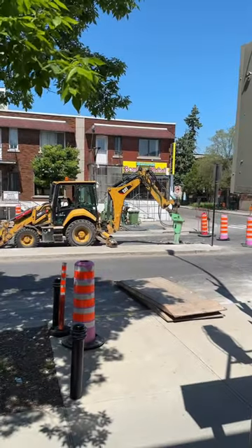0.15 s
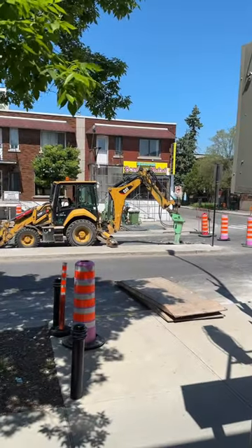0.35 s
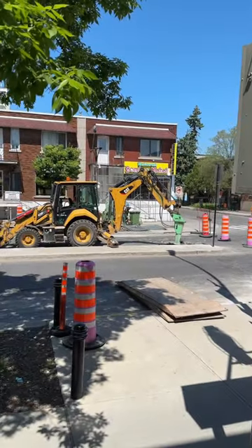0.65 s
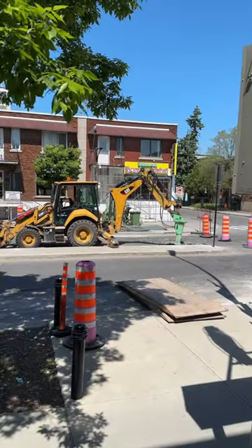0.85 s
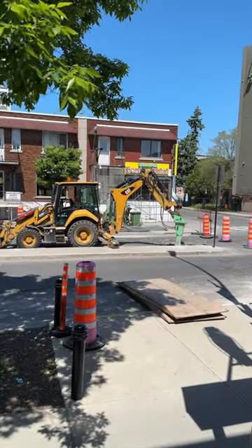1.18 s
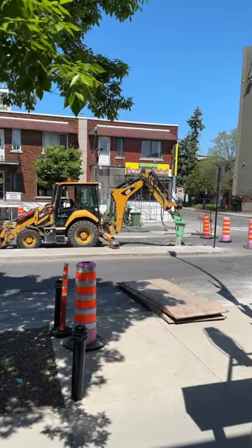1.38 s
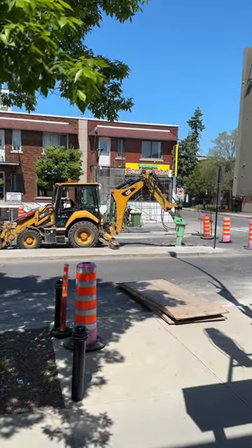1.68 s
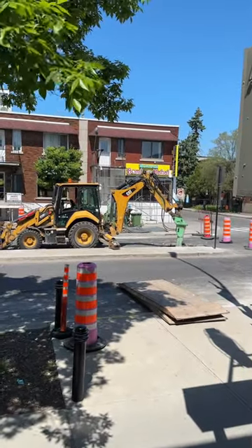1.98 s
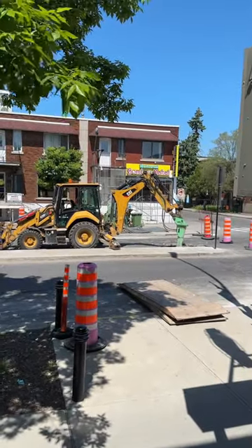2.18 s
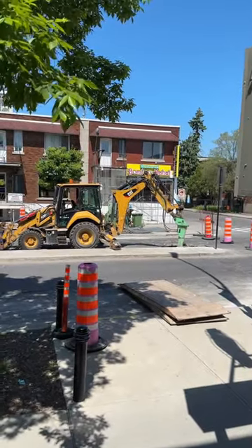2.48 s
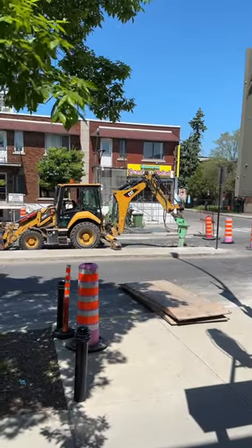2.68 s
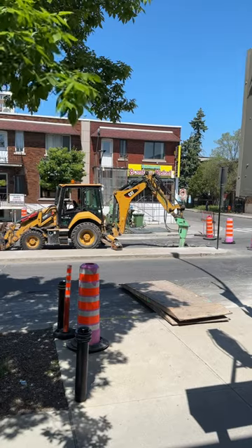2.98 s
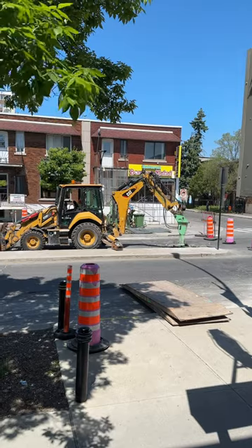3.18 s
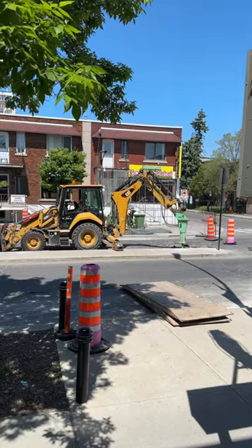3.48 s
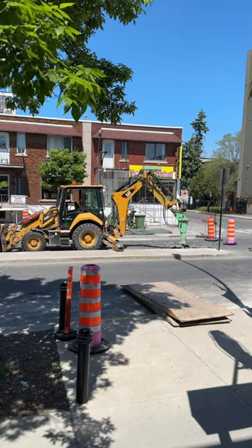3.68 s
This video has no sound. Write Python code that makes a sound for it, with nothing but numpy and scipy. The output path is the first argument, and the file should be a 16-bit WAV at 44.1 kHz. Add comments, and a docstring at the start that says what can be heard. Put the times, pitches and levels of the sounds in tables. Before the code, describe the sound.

A hydraulic breaker pounds stone rapidly with ringing steel over a diesel rumble, picked up by a phone across the street. The blows end with a short echo, loose metal clanks lightly, and the engine keeps running.

```python
"""A diesel engine rumbles across a street while its hydraulic breaker strikes about 14 times a second.
Each blow cracks on stone, rattles and rings the steel housing, thuds into the road and keeps the boom
ringing; loose chips tick and house fronts echo it. Near 2.5 s the blows stop and the street rings out.
Loose steel settles in a few small clanks as the engine runs on. A phone with two microphone ports listens."""
import sys
import numpy as np
from scipy import signal
from scipy.fft import rfft, irfft, next_fast_len
from scipy.io import wavfile
from scipy.ndimage import uniform_filter1d, map_coordinates

SR = 44100
rng = np.random.default_rng(int(sys.argv[2]) if len(sys.argv) > 2 else 0)


def to_wav(sig):
    """Store sig (one row per channel, or 1-D mono) as 16-bit WAV at the path in sys.argv[1].

    Samples outside -1..1 are clipped; the rate is SR.
    """
    pcm = np.clip(np.atleast_2d(sig), -1, 1) * 32767
    pcm = np.round(pcm).astype(np.int16)
    wavfile.write(sys.argv[1], SR, pcm.T)  # frames by channels


N = 169785
LEAD = SR // 2  # samples of run-up before time zero

# Chisel blows: start_s, level_db, then relative_db at each COLOUR_HZ
BLOWS = [(0.0321, -13.5, -6.5, -5.5, -7, -10.5), (0.1015, -11.5, -7, -6, -7, -13.5),
         (0.171, -14, -4.5, -5, -7, -11), (0.2409, -14, -6.5, -4, -5, -10.5),
         (0.3088, -6.5, -13, -10.5, -13, -18), (0.3776, -7.5, -13.5, -11.5, -10, -18.5),
         (0.4493, -10, -10, -7.5, -9, -14), (0.5158, -12.5, -8, -6, -7.5, -11.5),
         (0.5853, -12, -7, -4.5, -10.5, -13.5), (0.6544, -5.5, -15.5, -10.5, -14.5, -20),
         (0.724, -12.5, -5.5, -4.5, -9.5, -13.5), (0.7936, -13.5, -7.5, -3, -8.5, -12),
         (0.8626, -6.5, -14, -10.5, -13.5, -18.5), (0.9328, -15, -3.5, -2.5, -6, -11),
         (1.0005, -12.5, -10, -5.5, -8, -13.5), (1.0699, -10.5, -8, -8.5, -10, -15),
         (1.1394, -14, -5.5, -6, -5.5, -14), (1.2081, -9.5, -10, -12, -11.5, -19),
         (1.276, -10.5, -11.5, -11.5, -10, -17.5), (1.3447, -19, -4.5, -4, -2, -10),
         (1.4142, -12.5, -8.5, -9, -9, -16), (1.482, -12, -9, -8, -8, -15.5),
         (1.5503, -3.5, -16, -16.5, -17.5, -23), (1.6198, -14.5, -4.5, -5, -7, -13.5),
         (1.6886, -15, -7, -4, -7, -13), (1.757, -8.5, -11, -10.5, -13, -19.5),
         (1.8266, -10, -15, -10, -10, -18), (1.8951, -12, -8.5, -7.5, -8.5, -15),
         (1.9636, -9, -13.5, -11, -11.5, -19), (2.0319, -11.5, -9.5, -12, -9.5, -16.5),
         (2.1012, -6, -13.5, -15.5, -15.5, -23.5), (2.169, -13, -9.5, -10.5, -9.5, -16.5),
         (2.2392, -13, -11, -9, -10, -16), (2.3081, -3.5, -17.5, -21.5, -19.5, -26),
         (2.376, -10, -17.5, -14, -12.5, -20.5), (2.4475, -8.5, -14, -17.5, -16.5, -22.5)]
# Blow spectrum knots: frequency_hz
COLOUR_HZ = [450, 1500, 3200, 6600]
# Treble edge of the blows: time_s, gain_db
EDGE = [(0, 2), (.6, -1), (.95, 0.5), (1.1, -2), (1.4, -1), (1.6, -0.7), (2.45, 0.3)]
PERIOD_S, BLOW_CORRELATION = 0.069, 0.6
EDGE_HZ, EDGE_OCTAVES = 5200, 0.27

def breaker():
    """The chisel hammers stone. Returns impacts and ringing steel, both starting LEAD samples early."""
    t = np.arange(SR // 4) / SR
    impacts, steel = np.zeros((2, N + LEAD + len(t))), np.zeros(N + LEAD + len(t))
    noise = rng.standard_normal((2, len(t)))
    for start_s, level_db, *relative_db in all_blows():
        depth = np.clip(start_s / BLOWS[-1][0], 0, 1)  # the chisel sinks in
        edge_db = curve(EDGE, start_s)
        spectrum = list(zip(COLOUR_HZ, relative_db))
        colour = lambda hz: amp(level_db + along(spectrum, hz) + edge_db * band(hz, EDGE_HZ, EDGE_OCTAVES))
        fresh = rng.standard_normal(noise.shape)
        noise = BLOW_CORRELATION * noise + np.sqrt(1 - BLOW_CORRELATION ** 2) * fresh
        add_at(steel, start_s, steel_ring(t, depth, colour))
        low, mid, high = (colour(hz) for hz in COLOUR_HZ[:3])
        blow = housing_rattle(t, start_s, noise, colour) + high * crack(t, depth)
        blow += low * thud(t) + road_thump(t) + mid * chips(t, start_s)
        add_at(impacts, start_s, blow)
    return impacts[:, :N + LEAD], steel[:N + LEAD]


def all_blows():
    """Six run-up blows before time zero, then BLOWS."""
    first_s, *levels_db = BLOWS[0]
    return [(first_s - k * PERIOD_S, *levels_db) for k in range(6, 0, -1)] + list(BLOWS)


# Rattle spectrum: frequency_hz, level_db
RATTLE_SPECTRUM = [(30, -66), (50, -46), (91, -18.5), (190, -31), (337, -13.5), (420, -10), (490, -10),
                   (580, -10.5), (700, -6.5), (1000, -9), (1580, -12.5), (2400, -18), (3500, -17),
                   (4140, -24.5), (5500, -18.5), (6710, -18.5), (8000, -25.5), (9600, -20), (11000, -21)]
# Rattle band envelopes: centre_hz, rise_s, base_t60_s
RATTLE_BANDS = [(92.4, 0.024, 0.36), (327, 0.0077, 0.32), (794, 0.0041, 0.048), (1580, 0.0077, 0.15),
                (2800, 0.00015, 0.13), (4630, 0.0023, 0.092), (6400, 0.0014, 0.066),
                (11800, 0.00011, 0.066)]
# Rattle length: time_s, t60_factor
RATTLE_STRETCH = [(0, 0.73), (.8, 1), (1.05, 0.9), (1.4, 1.46), (1.6, 0.99), (2.2, 1.23), (2.45, 1.35)]

def housing_rattle(t, start_s, noise, colour, gain_db=27):
    """The housing rattles: a noise burst whose bands swell and die at their own rates."""
    centres_hz = [row[0] for row in RATTLE_BANDS]
    split = lambda hz: np.array([along(list(zip(centres_hz, w)), hz) for w in np.eye(len(centres_hz))])
    bands = filtered(noise[:, None], lambda hz: amp(along(RATTLE_SPECTRUM, hz)) * colour(hz) * split(hz))
    stretch = curve(RATTLE_STRETCH, start_s)
    envelopes = np.array([rise(t, rise_s) ** 2 * decay(t, t60_s * stretch)
                          for _, rise_s, t60_s in RATTLE_BANDS])
    return amp(gain_db) * (bands * envelopes).sum(1)


# Housing and tool modes: pitch_hz, first_blow_db, last_blow_db, t60_s, rise_s
STEEL_MODES = [(308.4, -3, -14.5, 0.17, 0.0046), (336, -9.5, -7, 0.13, .006),
               (595.2, -4, -14, 0.18, 0.0014), (549, -13, -13, 0.16, .0016),
               (414.5, -16, -9.5, 0.22, 0.003), (750.4, -16, -16.5, 0.5, 0.0028),
               (711, -11.5, -11, 0.13, 0.00066), (1116, -6.5, -21, 0.087, 0.0052),
               (1163, -7, -3.5, 0.056, 0.0029), (1487, 0.5, -0.5, 0.037, 0.0019),
               (1616, 2.5, 1, 0.037, 0.0025), (1765, -12, -2, 0.071, 0.0024),
               (2160, -8.5, -12, 0.068, 0.0024), (2623, -6.5, -18, 0.095, 0.0012),
               (3030, -17, 3, .045, 0.0008), (3156, -13, 7, 0.029, 0.0026),
               (3520, -12.5, -14, 0.26, 0.0038), (4376, -11.5, -13.5, 0.065, .0016),
               (4880, -7, -6.5, 0.037, 0.00084), (5970, -1.5, -7, 0.024, .0012),
               (6595, 5, 2.5, 0.022, 0.0005), (6770, -10, -8, 0.12, .0012)]

def steel_ring(t, depth, colour, gain_db=2.35, scatter_db=1.5, detune=0.0035):
    """Housing and tool ring; the balance of their modes shifts as the chisel sinks in."""
    ring = np.zeros(len(t))
    for hz, first_db, last_db, t60_s, rise_s in STEEL_MODES:
        level_db = gain_db + first_db + depth * (last_db - first_db) + scatter_db * rng.normal()
        tone = np.sin(2 * np.pi * hz * (1 + detune * rng.normal()) * t)
        ring += colour(hz) * amp(level_db) * tone * rise(t, rise_s) * decay(t, t60_s)
    return ring


def crack(t, depth, width_s=0.00014, first_db=1, last_db=6):
    """First bare contact of steel on stone."""
    return amp(first_db + depth * (last_db - first_db)) * (t / width_s - 1) * np.exp(-t / width_s)


def thud(t, delay_s=0.014, width_s=0.0013, gain_db=2.5):
    """The dull push after each crack."""
    offset = (t - delay_s) / width_s
    return amp(gain_db) * (offset ** 2 - 1) * np.exp(-offset ** 2 / 2)


def road_thump(t, delay_s=0.0054, low_hz=110.6, high_hz=140, gain_db=-18.5, high_relative_db=-6.5):
    """Two damped modes of the struck road."""
    age = np.maximum(t - delay_s, 0)
    modes = np.sin(2 * np.pi * low_hz * age) + amp(high_relative_db) * np.sin(2 * np.pi * high_hz * age)
    return amp(gain_db) * modes * rise(age, rise_s=0.0062) * decay(age, t60_s=0.062)


# Chip level relative to the blow: time_s, gain_db
CHIP_LEVEL = [(0, -20), (.9, -15), (1.05, -12), (1.4, -12.5), (1.55, -13), (2.45, -19)]

def chips(t, start_s, earliest_s=0.024, latest_s=0.041, low_hz=2600, high_hz=5800):
    """Loose chips: three random ticks after a blow, the higher ones weaker."""
    ticks = np.zeros(len(t))
    for when, pitch, softness in rng.random((3, 3)):
        centre_hz = low_hz * (high_hz / low_hz) ** pitch
        tick = unit(filtered(rng.standard_normal(len(t)), lambda hz: band(hz, centre_hz, octaves=0.45)))
        age = np.maximum(t - earliest_s - when * (latest_s - earliest_s), 0)
        gain = amp(0.5 - 2 * softness) * low_hz / centre_hz
        ticks += gain * tick * (age > 0) * decay(age, t60_s=0.071)
    return ticks * amp(curve(CHIP_LEVEL, start_s))


# Boom ring: time_s, level_db
BOOM_LEVEL = [(0, -30.5), (.11, -37), (.31, -28), (.7, -28.5), (1.06, -29), (1.14, -55), (1.24, -25.5),
              (1.36, -50), (1.52, -37), (1.6, -27.5), (1.7, -28.5), (1.76, -40), (1.84, -28.5), (1.95, -35),
              (2.1, -34.5), (2.22, -28), (2.32, -36.5), (2.5, -42), (2.62, -54)]

def boom(pitch_hz=488.2, waver_hz=2.4, swell_db=5.5):
    """The blows keep one strong boom mode ringing; it swells between them and wavers in pitch."""
    t = np.arange(N) / SR
    starts_s = np.array([row[0] for row in all_blows()])
    since_s = np.minimum(t - starts_s[np.searchsorted(starts_s, t) - 1], PERIOD_S)
    pulse_db = uniform_filter1d(swell_db * (since_s / PERIOD_S - 0.5), size=SR // 50)
    level_db = curve(BOOM_LEVEL, t) + pulse_db - 60 * (t > BOOM_LEVEL[-1][0])
    cycles = np.cumsum(pitch_hz + waver_hz * wobble(10)) / SR
    return np.sqrt(2) * amp(level_db) * np.sin(2 * np.pi * cycles)


# Steel knocks: start_s, level_db, centre_hz, width_octaves, rise_s, t60_s
CLANKS = [(2.47, -17.5, 407, 0.052, 0.024, 0.23), (3.09, -32.5, 1620, 1, 0.003, 0.17),
          (3.095, -43, 5750, 0.16, .004, 0.071), (3.264, -33.5, 2260, 1.06, 0.0015, 0.14)]

def clanks():
    """Loose steel settles in short knocks of band noise; the track starts LEAD samples early."""
    knocks, t = np.zeros((2, N + LEAD)), np.arange(SR // 4) / SR
    for start_s, level_db, centre_hz, octaves, rise_s, t60_s in CLANKS:
        knock = unit(filtered(rng.standard_normal((2, len(t))), lambda hz: band(hz, centre_hz, octaves)))
        add_at(knocks, start_s, amp(level_db) * knock * rise(t, rise_s) * decay(t, t60_s))
    return knocks


# House-front reflections: delay_s, gain_db
ECHOES = [(0.03, -13.5), (.043, -14.5)]
# Left-right likeness of direct sound: frequency_hz, correlation
DIRECT_CORRELATION = [(100, 1), (500, 0.99), (1400, 1), (2400, 1), (3000, 0.28), (5000, 0.77), (8000, 1),
                      (11000, 0.52)]

def house_fronts(source):
    """Direct sound plus two clear echoes off the houses."""
    echoes = sum(amp(gain_db) * np.pad(source, ((0, 0), (round(delay_s * SR), 0)))[:, :source.shape[1]]
                 for delay_s, gain_db in ECHOES)
    return spread(source + echoes, DIRECT_CORRELATION)


# Street decay: frequency_hz, t60_s
STREET_DECAY = [(100, 0.6), (500, 0.53), (1500, 2), (4000, 0.96), (9000, 0.25)]
# Tail spectrum: frequency_hz, gain_db
STREET_COLOUR = [(100, -2), (300, -15.5), (500, 5.5), (1500, -8.5), (3000, -2), (5000, -2.5), (8000, 5.5),
                 (11000, -19.5)]
# Left-right likeness of diffuse sound: frequency_hz, correlation
DIFFUSE_CORRELATION = [(60, 1), (130, 1), (300, 0.99), (700, 0.75), (1400, 0.97), (3000, 0.37),
                       (5000, 0.27), (8000, 0.69), (11000, 0.93)]

def street_tail(source, redraw_s=0.21):
    """Street reverberation: each frequency dies at its own rate, in a tail drawn anew every redraw_s."""
    n, step = len(source), round(redraw_s * SR)
    reverb = np.zeros((2, n + 3 * SR))
    padded = np.pad(source, (step, 2 * step))
    for start in range(0, n + step, step):
        hz, t, noise = signal.stft(rng.standard_normal((2, SR)), SR, nperseg=256)
        fade = rise(t, rise_s=0.0048) * decay(t, along(STREET_DECAY, hz)[:, None])
        fade /= np.linalg.norm(fade, axis=1, keepdims=True)
        tail = signal.istft(noise * fade, SR, nperseg=256)[1]
        piece = padded[start:start + 2 * step] * np.hanning(2 * step)
        heard = signal.fftconvolve(piece[None], tail / np.linalg.norm(tail[0]), axes=1)
        reverb[:, start:start + heard.shape[1]] += heard
    reverb = filtered(reverb[:, step:step + n], lambda hz: amp(along(STREET_COLOUR, hz)))
    return spread(reverb, DIFFUSE_CORRELATION)


# Engine loudness: time_s, level_db
ENGINE_LEVEL = [(0.0, -28.5), (0.32, -25.5), (0.51, -28.5), (0.93, -29.5), (1.49, -29), (2.14, -27.5),
                (3.23, -31), (3.51, -29.5), (3.7, -30), (3.85, -30)]
# Rumble spectrum: frequency_hz, level_db
RUMBLE_SPECTRUM = [(20, -58), (35, -28), (52, -6), (65, -13.5), (92, -4), (152, -9.5), (229, -15.5),
                   (275, -13.5), (335, -7.5), (385, -19.5), (635, -25.5), (840, -25.5), (2100, -33),
                   (3080, -38), (7130, -48), (11000, -54.5)]
# Firing harmonics: firing_multiple, level_db
FIRING_ORDERS = [(3, -4.5), (4, -7), (8, -14.5), (12, -28)]

def engine(firing_hz=29.45, speed_drift=0.01457, patch_db=0.83, flutter_db=1.9, gain_db=0.5):
    """Diesel: patchy rumble plus unsteady harmonics of the firing rate."""
    spectra = signal.stft(rng.standard_normal((2, N)), nperseg=1024)[2]
    patches = uniform_filter1d(rng.standard_normal(spectra.shape[1:]), 6, axis=0)
    patches = unit(uniform_filter1d(patches, 5, axis=1))
    noise = signal.istft(spectra * amp(patch_db * patches), nperseg=1024)[1][:, :N]
    rumble = filtered(noise, lambda hz: amp(along(RUMBLE_SPECTRUM, hz)))
    rumble = unit(spread(rumble, DIFFUSE_CORRELATION))
    firings = np.cumsum(firing_hz * (1 + speed_drift * wobble(3.6))) / SR
    orders = sum(amp(level_db + 1 + flutter_db * wobble(8)) * np.sin(2 * np.pi * multiple * firings)
                 for multiple, level_db in FIRING_ORDERS)
    return amp(gain_db + curve(ENGINE_LEVEL, np.arange(N) / SR)) * (rumble + orders)


def amp(db):
    return 10 ** (np.asarray(db) / 20)


def unit(x):
    return x / np.sqrt(np.mean(x ** 2) + 1e-20)


def rise(t, rise_s):
    return 1 - np.exp(-t / rise_s)


def decay(t, t60_s):
    return amp(-60 * t / t60_s)


def band(hz, centre_hz, octaves):
    return np.exp(-(np.log2((hz + 1) / centre_hz) / octaves) ** 2)


def curve(points, time_s):
    return np.interp(time_s, *np.transpose(points))


def along(points, hz):
    """Interpolate on a log frequency axis."""
    knots_hz, values = np.transpose(points)
    return np.interp(np.log(hz + 1), np.log(knots_hz + 1), values)


def add_at(track, start_s, sound):
    """Mix into a track that starts LEAD samples early."""
    start = LEAD + round(start_s * SR)
    track[..., start:start + sound.shape[-1]] += sound


def wobble(rate_hz):
    """Smooth random curve, rate_hz knots a second."""
    return map_coordinates(rng.standard_normal(int(N * rate_hz / SR) + 4), [np.arange(N) * rate_hz / SR])


def filtered(x, response):
    """Apply a complex frequency response."""
    size = next_fast_len(x.shape[-1] + 4096)
    return irfft(rfft(x, size) * response(np.fft.rfftfreq(size, 1 / SR)), size)[..., :x.shape[-1]]


def spread(pair, correlation):
    """Mix a pair to left and right; unrelated inputs get the given correlation."""
    angle = lambda hz: np.arccos(np.clip(along(correlation, hz), -1, 1)) / 2
    mid, side = filtered(pair, lambda hz: np.array([np.cos(angle(hz)), np.sin(angle(hz))]))
    return np.array([mid + side, mid - side])


def scene(ring_send_db=-8):
    """Breaker and clanks sound through the street; boom and engine add directly."""
    impacts, ring = breaker()
    impacts = impacts + clanks()
    street = house_fronts(impacts + ring) + street_tail(impacts[0] + amp(ring_send_db) * ring)
    return street[:, LEAD:] + boom() + engine()


# Right port lag: frequency_hz, phase_rad
PORT_LAG = [(100, 0), (2200, 0), (2670, 1.6), (2930, 2.1), (3620, -.3), (3880, .2), (5250, -.9),
            (5860, -.3), (6630, -1), (8700, -2), (9730, -2.9), (10500, -np.pi)]
# Port balance: frequency_hz, left_over_right_db
PORT_BALANCE = [(60, 0.5), (240, -0.5), (950, 0), (3770, -0.2), (15000, -0.5)]
# Mid-channel response: frequency_hz, gain_db
MID_RESPONSE = [(9000, 0), (9800, 1.5), (11000, -16.5), (16000, -27)]
# Treble roll-off: frequency_hz, gain_db
TREBLE_ROLLOFF = [(11000, 0), (13000, -6), (15600, -18), (16000, -38)]

def record(dry, limit_hz=16480):
    """Left and right differ in level and phase; the top treble is faint and heard mostly at the sides."""
    balance = lambda hz: amp(along(PORT_BALANCE, hz) / 2)
    ports = lambda hz: np.array([balance(hz), np.exp(-1j * along(PORT_LAG, hz)) / balance(hz)])
    left, right = filtered(dry, ports)
    rolloff = lambda hz: amp(along(TREBLE_ROLLOFF, hz)) * (hz < limit_hz)
    mid = filtered((left + right) / 2, lambda hz: amp(along(MID_RESPONSE, hz)) * rolloff(hz))
    side = filtered((left - right) / 2, rolloff)
    return np.array([mid + side, mid - side])


dry = scene()
out = record(dry)
to_wav(out)
```